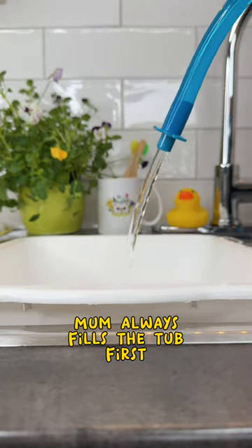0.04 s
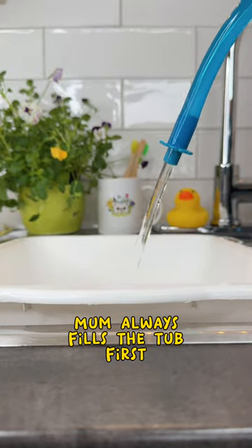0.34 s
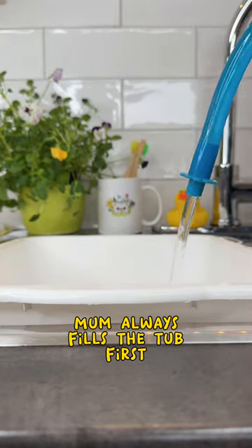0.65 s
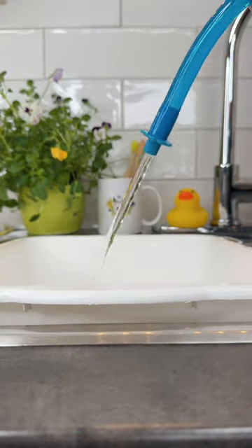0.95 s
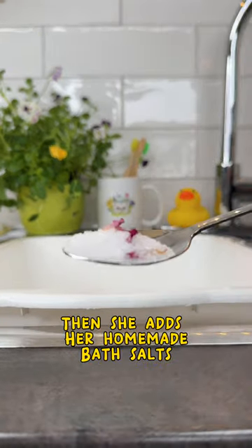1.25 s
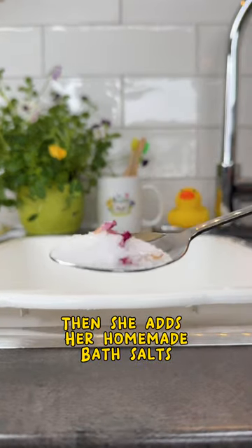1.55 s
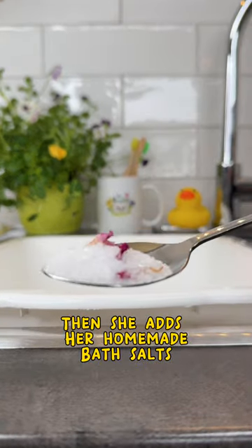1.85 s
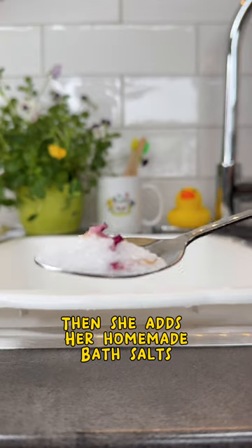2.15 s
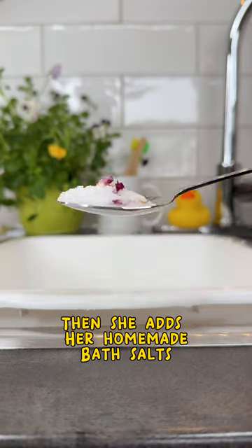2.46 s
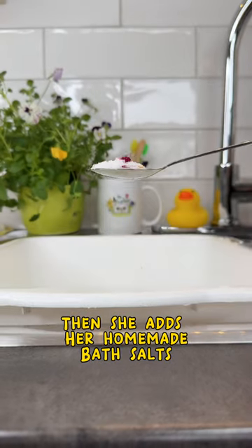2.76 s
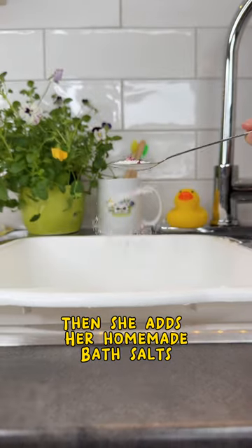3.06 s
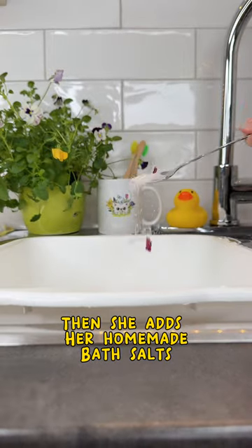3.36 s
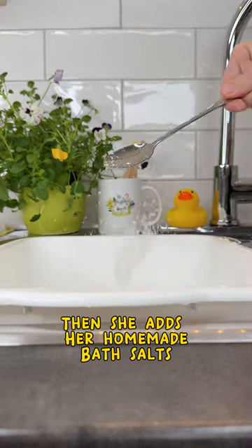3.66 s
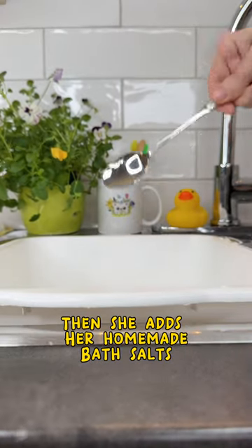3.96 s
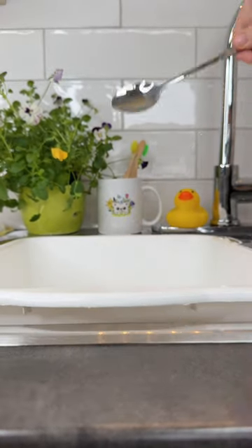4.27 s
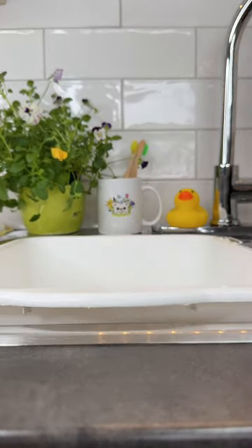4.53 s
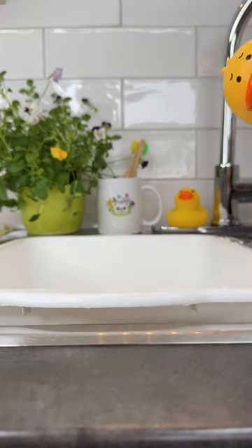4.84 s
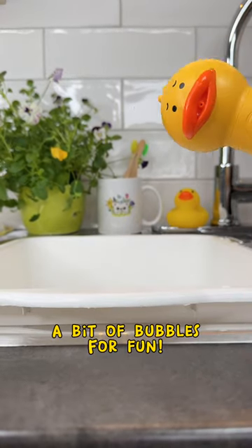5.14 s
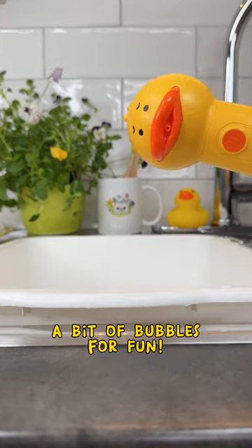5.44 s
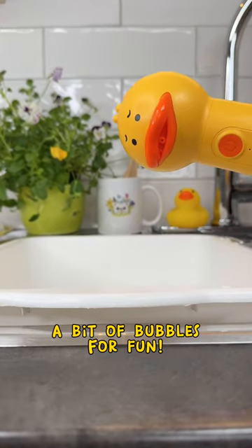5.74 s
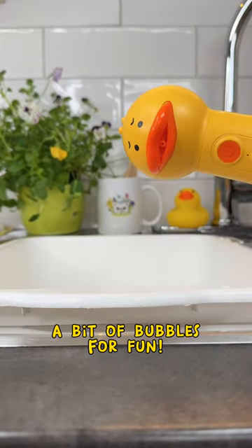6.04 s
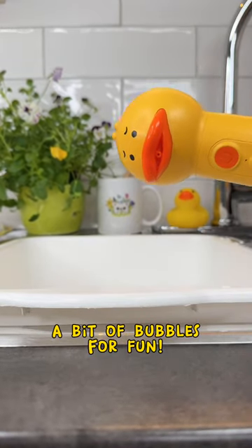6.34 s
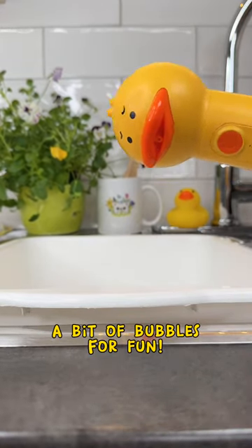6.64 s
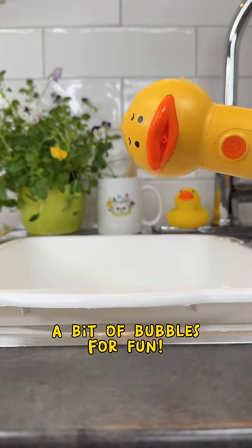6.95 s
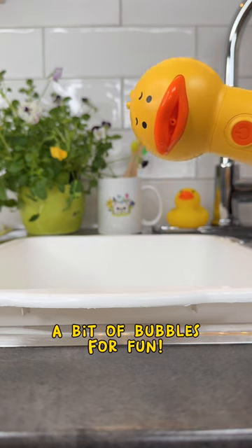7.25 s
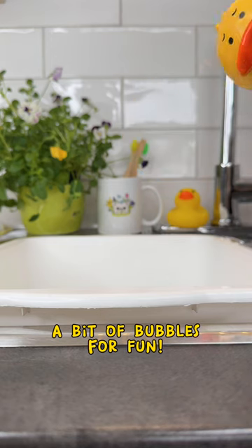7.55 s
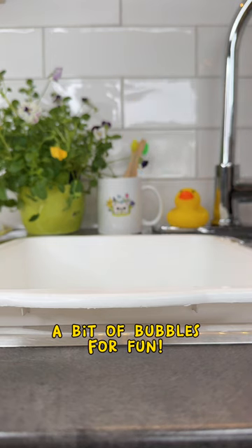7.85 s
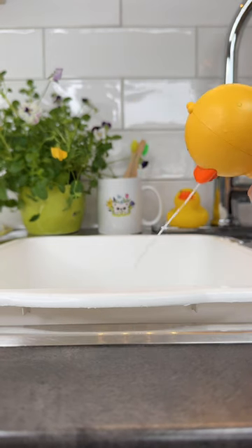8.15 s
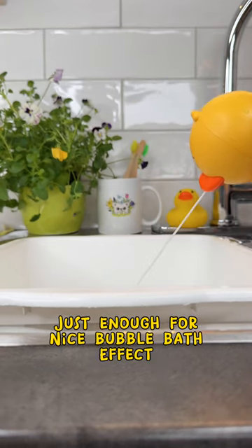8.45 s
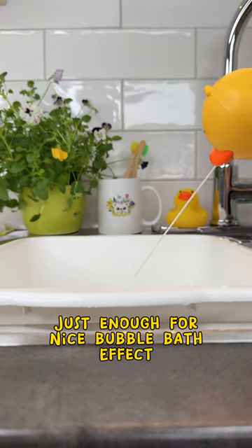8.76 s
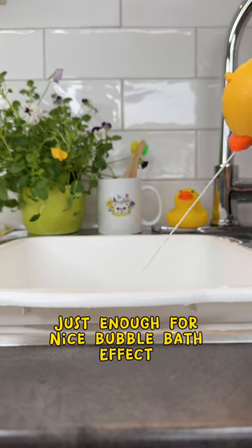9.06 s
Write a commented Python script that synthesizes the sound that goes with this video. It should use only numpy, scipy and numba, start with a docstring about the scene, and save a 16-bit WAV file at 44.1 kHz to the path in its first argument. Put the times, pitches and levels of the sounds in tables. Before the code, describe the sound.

Water gushes loudly from a hose into a small tub, bubbling, gurgling and spattering, then cuts off abruptly. After a pause, bath salts trickle onto the water with fine ticks, a few clumps splash in, and the grains fizz away softly. Following another quiet stretch, a battery toy sprayer spits air and buzzes as it squirts a thin jet into the water. It is all heard close by, indoors, over a low room rumble.

```python
"""Water gushes from a hose into a small tub on a counter, bubbling and spattering, until the sound breaks off
abruptly. Bath salts trickle off a spoon and tick on the water; clumps splash in and the sunken grains fizz out.
Last, a battery sprayer spits air, and its pump buzzes a thin jet into the water. A low room rumble lies under
it all, heard through two closely spaced microphone ports."""
import sys
import numpy as np
from scipy import signal
from scipy.fft import rfft, irfft, next_fast_len
from scipy.io import wavfile
from numba import njit

SR = 44100
rng = np.random.default_rng(int(sys.argv[2]) if len(sys.argv) > 2 else 0)


def wav_out(sig):
    """Save sig, one row per channel (or a flat mono array), as 16-bit PCM at SR to the path in sys.argv[1]."""
    wavfile.write(sys.argv[1], SR, np.round(np.clip(np.atleast_2d(sig).T, -1, 1) * 32767).astype(np.int16))


N = 401310
T = np.arange(N) / SR
HOSE_OFF_S, JET_ON_S = 1.219, 8.111
HOSE_TRIM = np.sqrt(HOSE_OFF_S / T[-1])  # turns rms 1 over the scene into rms 1 while the hose runs

# stereo width, as gain on the side signal: f/Hz, level/dB
SIDE_EQ = [(60, -26.5), (200, -14.5), (380, -6.5), (700, 1), (1290, -4.5), (1850, -19), (2500, -2.5),
           (3100, 1.5), (4400, 0), (8000, -3), (11500, -35.5), (15000, -15)]
# how far the left port leads the right: f/Hz, phase/rad
PORT_LEAD = [(20, 0), (4400, 0), (6000, -.7), (8000, -1.55), (10100, -2.15), (11000, -3), (13200, -3.3),
             (14200, -3.9), (15500, -4.6)]
# bass-heavy room tone: f/Hz, level/dB
ROOM_EQ = [(20, -12.5), (40, -9), (62, 2), (110, 0), (165, -8.5), (225, -5.5), (400, -13), (540, -12.5),
           (800, -17), (1150, -25.5), (1550, -28.5), (2000, -33), (2380, -33), (2950, -44), (3700, -46.5),
           (5000, -50.5), (6000, -47), (11500, -52.5), (15000, -52)]
# dull, soft hiss: f/Hz, level/dB
HISS_EQ = [(800, 0.5), (2200, 1.5), (4500, -8), (6500, -15), (12000, -32)]
# hiss cues (a negative fall swells): start/s, end/s, level/dB, fall/(dB/s)
HISS_CUES = [(1.217, 1.646, -72, 12.5), (3.81, 4.42, -66.5, 18.5), (7.5, 8.105, -83.5, -4)]
# single bubbles that plop, plink or snap: t/s, level/dB, f/Hz, t60/s
SOLO_BUBBLES = [(.001, -23.5, 6380, 0.02), (0.025, -29, 6100, 0.027), (.07, -30, 375, 0.072),
                (.074, -33.5, 830, 0.026), (0.083, -32.5, 1750, 0.025), (.152, -33, 365, .06),
                (.193, -34.5, 380, .06), (.243, -40, 360, 0.1), (.344, -37.5, 2410, .04),
                (.36, -35, 486, 0.043), (.505, -24.5, 2400, 0.019), (.571, -31, 2390, .025),
                (.605, -33, 392, 0.065), (.652, -35, 272, 0.1), (.67, -38, 376, .1),
                (.682, -34.5, 2460, 0.026), (0.875, -38, 394, 0.17), (.986, -29, 2610, 0.034),
                (.988, -33, 1217, 0.044), (1.048, -37, 1850, 0.04), (1.05, -33.5, 380, .08),
                (1.068, -37.5, 667, .05), (1.074, -32, 1295, .04), (3.131, -52, 3320, .03),
                (3.184, -52, 3020, 0.02), (3.321, -47.5, 4070, 0.025), (3.391, -35.5, 1866, 0.034),
                (3.4125, -43.5, 5200, .012), (3.4254, -11.5, 7650, 0.0022), (3.4385, -20.5, 5820, 0.0065),
                (3.486, -51, 2650, 0.04), (3.563, -41, 7800, .02), (3.584, -40.5, 7550, .02),
                (3.6, -44, 6300, 0.021), (3.646, -58.5, 4000, 0.026), (8.194, -28.5, 1236, 0.0087),
                (8.197, -22, 746, 0.012), (8.347, -27, 2120, 0.0088), (8.643, -31, 1670, 0.01),
                (9.0225, -31.5, 2780, 0.014), (9.0312, -23, 664, 0.031), (9.045, -30.5, 695, 0.038)]
# short bright ticks: grains or droplets landing, and one faint click at 4.73 s: t/s, level/dB
TICK_HITS = [(3.128, -42), (3.3105, -38), (3.415, -37), (3.428, -32), (3.5635, -43), (3.583, -43),
             (3.598, -53), (3.653, -59), (4.004, -58), (4.026, -58), (4.062, -59), (4.079, -60),
             (4.12, -64), (4.142, -60), (4.161, -63), (4.22, -64), (4.335, -70), (4.452, -75),
             (4.5707, -73), (4.731, -69), (8.389, -41.5), (8.4, -40), (8.683, -42), (8.7645, -36),
             (8.846, -44), (9.04, -34.5)]
# their bright tone: f/Hz, level/dB
TICK_EQ = [(500, -43.5), (2000, -17.5), (3500, -21.5), (5500, -5), (8000, 3), (11000, 2.5), (15000, 4)]

# salt slides off the spoon in small lots: t/s, level/dB
SALT_SLIDES = [(2.795, -67), (2.85, -66), (2.94, -58), (3.01, -62.5), (3.09, -57), (3.13, -46.5),
               (3.305, -53.5), (3.41, -44), (3.48, -52.5), (3.555, -53.5), (3.99, -66), (4.11, -79),
               (4.56, -73), (4.64, -73)]
# sizzle of fine grains on water: f/Hz, level/dB
SALT_EQ = [(500, -40), (2000, -13.5), (3500, -16), (5000, -16.5), (7500, -4), (11000, -8.5), (14000, 1.5),
           (14900, 11.5), (15600, -4)]
# clumps of salt splashing in: t/s, level/dB, hold/s, t60/s
CLUMP_HITS = [(3.373, -46.5, 0.0034, 0.066), (3.39, -53, .003, .04), (3.696, -43, 0.0043, 0.053),
              (3.707, -32.5, 0.018, 0.19), (3.798, -34, 0.0018, 0.039), (3.829, -44.5, 0.0033, 0.045)]
# their splash: f/Hz, level/dB
SPLASH_EQ = [(200, -22), (350, -7), (600, -13.5), (1000, -9), (1400, -4), (1650, -9.5), (2000, -6),
             (4000, -10.5), (7000, 2), (11000, 0.5), (15000, 1.5)]
# the tub rings under each clump: f/Hz, width/Hz, level/dB
KNOCK_MODES = [(360, 62, -17), (1020, 40, -10.5), (1325, 34, 6), (2026, 160, -6.5), (2780, 180, -6)]
# sinking salt drags down swarms of small bubbles: t/s, level/dB
SWARM_CUES = [(3.168, -48), (3.305, -55), (3.435, -56.5), (3.505, -58.5), (3.63, -61)]
# their sparkle: f/Hz, level/dB
SWARM_EQ = [(2000, -17.5), (3300, -10.5), (4500, -0.5), (6000, 4), (7800, 1), (10000, -8.5)]

# turning rate of the sprayer motor: t/s, f/Hz
MOTOR_SPEED = [(8.1, 73.6), (8.3, 73.95), (8.45, 74.15), (8.68, 74.65), (8.9, 74.4), (9.1, 74.6)]
# overtones of its buzz: multiple of the turning rate, level/dB
MOTOR_HARMONICS = [(3, 1), (8, -6), (9, -4), (10, -5), (12, -9), (14, -8), (16, -9), (18, -1), (19, -4),
                   (20, -6), (21, -3), (22, -4), (23, 0), (24, -3), (25, -6), (27, 0), (28, -4), (29, 0),
                   (30, -1), (31, -3), (32, 1), (33, -7), (35, -6), (36, -5), (39, -7), (40, -7), (41, -8),
                   (76, -7), (79, -10), (81, -11), (82, -9), (83, -2.5)]
# one overtone swells into a whine as the sprayer is moved: t/s, level/dB against the buzz
WHINE_SWELL = [(8.1, -12), (8.65, -13), (8.93, -5.5), (9.1, -5)]
# rattle of the pump gears: f/Hz, level/dB
GEAR_EQ = [(200, -35), (650, -16), (1100, -16), (1700, -20), (2200, -11), (2700, -10), (3900, -22),
           (5200, -11), (6100, 0.5), (7000, -18), (9300, 0.5), (10000, -11), (12000, -22), (15500, -9)]
# the thin jet hitting water: f/Hz, level/dB
JET_EQ = [(60, 1), (230, -1.5), (400, -5), (640, -3.5), (1100, -4.5), (1500, 1), (2000, 0.5), (3000, -5.5),
          (3900, -10), (5100, -9.5), (6200, -6), (7200, -7), (9600, -15), (15500, -7.5)]
# its drumming on the water: f/Hz, width/Hz, level/dB
JET_DRUM_MODES = [(598, 64, 1), (684, 56, -3.5)]
# slugs of air pop out of the nozzle: t/s, level/dB
AIR_POPS = [(8.111, -45), (8.129, -33), (8.1425, -27), (8.157, -28), (8.1705, -42), (8.1735, -24.5),
            (8.179, -27), (8.201, -34)]
# sharp spit of the nozzle: f/Hz, level/dB
SPIT_EQ = [(300, -8), (700, -22), (2000, -3), (3800, -5), (6000, -3), (8500, 4), (11000, 8), (15000, 0.5)]

# splashing rises and falls as the hose sways: t/s, level/dB
HOSE_SWAY = [(0, 2.5), (.11, -4), (.19, 1.5), (.27, -2), (.47, -1), (.55, -0.5), (.63, 0), (.73, -2),
             (.8, -6), (.92, -3.5), (.99, -0.5), (1.2, 0)]
# bubbling of the stream: f/Hz, level/dB
BUBBLING_EQ = [(250, -15), (450, 3.5), (570, -16.5), (700, 3.5), (1000, 1), (1550, -0.5), (2400, 3),
               (3200, 0.5), (4600, -11), (8000, -25)]
# sharp resonances of the air in the tub: f/Hz, width/Hz, level/dB
TUB_AIR_MODES = [(678.5, 45, 1.5), (936, 48, 1.5), (1254, 89, 2), (1825, 100, 2), (2330, 40, 0.5),
                 (2570, 90, -0.5), (2880, 45, -4), (3210, 99, -5)]
# the stream wobbles and gulps a cluster of bubbles: t/s, level/dB, f/Hz, hold/s
GULP_CUES = [(0.011, -47.5, 2395, 0.003), (.067, -41, 900, 0.01), (0.086, -40.5, 1697, 0.007),
             (.159, -41, 1940, .023), (0.187, -41, 1600, .006), (.366, -41, 2390, 0.0055),
             (0.409, -49, 990, 0.053), (0.505, -38.5, 2460, .005), (0.57, -39.5, 2100, 0.0081),
             (0.602, -46, 1100, 0.027), (0.607, -51.5, 3220, .04), (0.679, -45.5, 2290, 0.0087),
             (0.977, -46.5, 2390, .0065), (1.07, -43.5, 1500, .007), (1.115, -47.5, 2600, 0.028)]
# bright spatter, with a deep EQ notch cut at 11.5 kHz: f/Hz, level/dB
SPATTER_EQ = [(1000, -11.5), (3000, -5.5), (4600, -4.5), (6500, -0.5), (8000, -1), (10000, -2.5),
              (11500, -47), (15500, 1)]
# the stream slaps the surface and throws spatter: t/s, level/dB, hold/s
SLAP_HITS = [(0, -47, 0.0091), (0.138, -43, 0.026), (0.328, -52, 0.0077), (.442, -45, .002),
             (0.835, -53, 0.033), (0.954, -44, 0.03), (1.067, -36.5, .005)]
# large pockets of air ring in the tub: f/Hz, width/Hz, level/dB
POCKET_MODES = [(225.3, 20, -9.5), (264, 41, -1), (305.7, 26, -3.5), (381, 22, 7), (420, 5.8, 1),
                (492, 17, -6)]
# the tub floor drums under the stream: f/Hz, width/Hz, level/dB
FLOOR_MODES = [(69, 12, 1.5), (105.2, 13, 2)]


def undb(db):
    """Decibels to gain."""
    return 10 ** (np.asarray(db) / 20)


def unit(x):
    """Scale to rms 1."""
    return x / np.sqrt(np.mean(x ** 2))


def automation(points):
    """Straight ramps between (time, value) points."""
    return np.interp(T, *np.array(points).T)


def gate(start, end):
    """Open between two times, with 4 ms fades."""
    return np.clip((T - start) / .004, 0, 1) * np.clip((end - T) / .004, 0, 1)


def envelope(start, db, hold, t60, attack=1 / SR):
    """A straight attack, a hold and an exponential decay; times in seconds."""
    age = T - start
    out = np.zeros(N)
    live = (age > 0) & (age < attack + hold + 2 * t60)
    age = age[live]
    decay = np.exp(-np.log(1000) * np.maximum(age - attack - hold, 0) / t60)
    out[live] = undb(db) * np.minimum(age / attack, 1) * decay
    return out


def bursts(cues, **shape):
    """Trigger one envelope shape at each (time, level) cue."""
    return sum(envelope(start, db, **shape) for start, db in cues)


def filtered(x, response):
    """Apply a complex response given as a function of frequency."""
    size = next_fast_len(N + 16384, True)
    hz = np.maximum(np.arange(size // 2 + 1) * SR / size, 1)
    return irfft(rfft(x, size) * response(hz), size)[:N]


def along(hz, points):
    """Read (frequency, value) points on a log-frequency axis."""
    points = np.array(points)
    return np.interp(np.log(hz), np.log(points[:, 0]), points[:, 1])


def eq(x, points):
    """Shape a sound with an EQ curve, then scale to rms 1."""
    return unit(filtered(x, lambda hz: undb(along(hz, points))))


def ring(x, modes):
    """Parallel resonators, each given as (frequency, width, level)."""
    def response(hz):
        return sum(undb(db) / (1 + 1j * (hz * hz - f * f) / (hz * width)) for f, width, db in modes)
    return filtered(x, response)


def noise():
    """White noise."""
    return rng.standard_normal(N)


def wander(rate):
    """Random drift with a spread near 1, taking `rate` new values a second."""
    knots = rng.standard_normal(4000)
    return 1.2 * np.interp(T * rate, np.arange(len(knots)), knots)


def impacts(rate, spread):
    """Random clicks, `rate` a second; `spread`, held to 1..6 dB, makes some stand out."""
    when = np.flatnonzero(rng.random(N) < rate / SR)
    sign, size = rng.standard_normal((len(when), 2)).T
    out = np.zeros(N)
    out[when] = np.sign(sign) * undb(np.clip(spread, 1, 6) * np.clip(size, -3, 2.3))
    return unit(out)


@njit
def bubble_train(start, size, hz, t60, rise):
    """Each bubble is a sine that swells within a cycle or two, then dies while its pitch climbs."""
    out = np.zeros(N)
    for k in range(len(start)):
        first, length = int(start[k] * SR), int(t60[k] * SR) + 2
        phase, gain = 0., size[k]
        fade = np.exp(-np.log(1000) / length)
        for i in range(max(first, 0), min(first + length, N)):
            phase += 2 * np.pi * hz[k] * (1 + rise * (i - first) / length) / SR
            out[i] += gain * np.sin(phase) * min(phase / (3 * np.pi), 1.)
            gain *= fade
    return out


def bubble_cloud(start, end, low_hz, high_hz, cycles, spread_db, rise, count):
    """Many bubbles of random size; the small ones are high and brief."""
    when, pitch, size, life = rng.random((count, 4)).T
    hz = low_hz + (high_hz - low_hz) * pitch ** 2
    gain = undb(spread_db * np.minimum(-np.log(1 - size), 3)) * (hz / high_hz) ** .75
    t60 = cycles * (.5 + life) / hz
    return unit(bubble_train(start + (end - start) * when, gain, hz, t60, rise))


def reflections(x):
    """Quick echoes from the tub, which shift as the water rocks, then the faint tail of the room."""
    age = T[:SR // 3]
    rocking = 1.4 * wander(9)
    out = 0
    for weight, db, t60 in ((np.cos(rocking), -7, .15), (np.sin(rocking), -7, .15), (1, -15, .3)):
        tail = rng.standard_normal(len(age)) * np.exp(-np.log(1000) * age / t60) * (age > .001)
        out = out + weight * undb(db) * signal.oaconvolve(x, tail / np.sqrt(np.sum(tail ** 2)))[:N]
    # long waves pass round the small walls
    return signal.sosfilt(signal.butter(2, 300, "high", fs=SR, output="sos"), out)


def in_room(x, wet=1):
    """Mid and side of a source in or near the tub."""
    mid, side = (wet * reflections(x) for _ in range(2))
    return np.array([x + mid, side])


def ports(mid, side):
    """Left and right at two closely spaced ports, further out of phase the higher the treble."""
    side = filtered(side, lambda hz: undb(along(hz, SIDE_EQ)))
    left = filtered(mid + side, lambda hz: np.exp(.5j * along(hz, PORT_LEAD)))
    right = filtered(mid - side, lambda hz: np.exp(-.5j * along(hz, PORT_LEAD)))
    return np.array([left, right])


def room_tone():
    """A bed of low rumble with a soft hum and a thin, wavering whine, as mid and side."""
    mid, side = (eq(noise() * undb(.81 * wander(3.9)), ROOM_EQ) for _ in range(2))
    hum = unit(ring(noise(), [(59.6, 6.5, 0)]))
    whine = unit(ring(noise(), [(1370, 40, 0)])) * undb(2.5 * wander(1.5))
    return np.array([undb(-57.5) * mid + undb(-64) * hum + undb(-85.5) * whine, undb(-56.5) * side])


def faint_hiss():
    """A soft hiss that comes and goes around the louder sounds."""
    fader = sum(undb(db - fall * np.clip(T - start, 0, end - start)) * gate(start, end)
                for start, end, db, fall in HISS_CUES)
    return eq(noise(), HISS_EQ) * fader


def rustle():
    """A brief, fine-grained rustle."""
    grains = unit(ring(impacts(4000, spread=3), [(5200, 1800, 0)]))
    return grains * undb(-80) * gate(4.652, 4.738)


def plops():
    """The large bubbles that stand out, and the tiny ones that snap."""
    start, db, hz, t60 = np.array(SOLO_BUBBLES).T.copy()
    return bubble_train(start, undb(db), hz, t60, rise=.1)


def ticks():
    """Short bright ticks: grains or droplets landing, and one faint click at 4.73 s."""
    crackle = eq(impacts(9000, spread=3.5), TICK_EQ)
    return crackle * bursts(TICK_HITS, attack=.0015, hold=.0023, t60=.027)


def salt_trickle():
    """Fine grains tick on the water and trap tiny bubbles; the sunken salt fizzes out."""
    pings = bubble_cloud(2.8, 4.7, 5000, 15500, cycles=110, spread_db=3, rise=.03, count=1800)
    pings *= np.sqrt(1.9 / T[-1])  # rms 1 over their own span
    grains = eq(impacts(5000, spread=2.5) + undb(-7) * pings, SALT_EQ)
    sliding = bursts(SALT_SLIDES, attack=.03, hold=.013, t60=.3)
    sprinkling = envelope(2.95, db=-55.5, attack=.45, hold=.27, t60=.2)  # while the spoon is tipped
    fizzing = envelope(3.72, db=-60, attack=.03, hold=0, t60=1.93)
    return grains * (np.hypot(sliding, sprinkling) + fizzing) * gate(0, 4.74)


def salt_clumps():
    """Clumps break the surface with a splash and set the tub ringing."""
    plunging = sum(envelope(*hit) for hit in CLUMP_HITS)
    splash = eq(impacts(9000, spread=1), SPLASH_EQ)
    knocks = impacts(9000, spread=2)
    ringing = ring(knocks * plunging, KNOCK_MODES) / np.std(ring(knocks, KNOCK_MODES))
    return splash * plunging + undb(-11) * ringing


def salt_swarms():
    """Sinking salt drags down swarms of small bubbles."""
    cloud = bubble_cloud(3.1, 3.7, 2400, 9500, cycles=50, spread_db=2.2, rise=.05, count=2400)
    sparkle = eq(cloud, SWARM_EQ) * np.sqrt(.6 / T[-1])
    return sparkle * bursts(SWARM_CUES, attack=.012, hold=.011, t60=.12)


def pump_motor(turns, stroke):
    """The motor buzzes and whines; the gears rattle much the same on every turn."""
    shaky = turns + .0016 * wander(120)  # play in the gears blurs the high overtones
    buzz = unit(sum(undb(db) * np.sin(2 * np.pi * (k * shaky + rng.random()))
                    for k, db in MOTOR_HARMONICS))
    whine = np.sqrt(2) * np.sin(2 * np.pi * 26 * turns) * undb(automation(WHINE_SWELL))
    teeth = rng.standard_normal(600)
    rattle = np.interp(shaky % 1, np.linspace(0, 1, len(teeth)), teeth)
    return undb(-5) * (buzz + whine) + undb(-10) * eq(rattle * stroke, GEAR_EQ)


def thin_jet(stroke):
    """The pulsing jet drills bubbles into the water and drums on it."""
    cloud = bubble_cloud(JET_ON_S, T[-1], 463, 4130, cycles=25, spread_db=5, rise=.087, count=900)
    cloud *= np.sqrt(1 - JET_ON_S / T[-1])
    splashing = eq(impacts(7000, spread=1) * stroke + undb(-7.5) * cloud, JET_EQ)
    drumming = unit(ring(impacts(2500, spread=6), JET_DRUM_MODES))
    return undb(-3.5) * splashing + undb(-10.5) * drumming


def nozzle_spit():
    """Air spits out unevenly as the pump primes, then the last of it clears from the tube."""
    priming = envelope(JET_ON_S, db=-40, attack=.036, hold=.036, t60=.11)
    clearing = envelope(JET_ON_S, db=-41, attack=.036, hold=.036, t60=1)
    pops = bursts(AIR_POPS, hold=.0012, t60=.012)
    crackle = eq(impacts(12000, spread=6), SPIT_EQ)
    return crackle * ((priming + clearing) * undb(.8 * wander(130)) + pops)


def sprayer():
    """A battery pump strokes twice a turn and weakens a little as it runs; mid and side."""
    turns = np.cumsum(automation(MOTOR_SPEED) * (1 + .00049 * wander(30))) / SR
    stroke = .96 + np.exp(-(2 * turns % 1) / .44)
    running = undb(-44 - .2 * np.maximum(T - JET_ON_S, 0)) * gate(JET_ON_S, 10)
    motor = pump_motor(turns, stroke) * running
    water = thin_jet(stroke) * running + nozzle_spit()
    # the motor is held above the tub, clear of most echoes
    return in_room(water) + in_room(motor, wet=.5)


def hose_bubbling():
    """The stream drags air under, and the hollow of the tub rings with it."""
    cloud = bubble_cloud(0, HOSE_OFF_S, 350, 5000, cycles=31, spread_db=2, rise=.099, count=3000)
    patter = impacts(6000, spread=6) * undb(3.5 * wander(60)) * gate(-1, HOSE_OFF_S)
    water = (cloud * HOSE_TRIM + undb(-1) * patter) * undb(.5 * wander(45))
    # the heaving surface bends the resonances of the tub
    hollow = np.interp(T + .0007 * wander(9), T, ring(water, TUB_AIR_MODES))
    return eq(water + undb(2.5) * hollow, BUBBLING_EQ) * HOSE_TRIM


def hose_spatter():
    """The top layer, notched by EQ: droplets tick on the surface among tiny fizzing bubbles."""
    fizz = bubble_cloud(0, HOSE_OFF_S, 3500, 12010, cycles=58, spread_db=3, rise=.12, count=1800)
    droplets = impacts(6000, spread=3) + undb(-4.5) * fizz * HOSE_TRIM
    return eq(droplets * gate(-1, HOSE_OFF_S), SPATTER_EQ) * HOSE_TRIM


def tub_body(sway_db):
    """The low end: large air pockets gurgle, and the tub floor drums louder as the water deepens."""
    pockets = bubble_cloud(0, HOSE_OFF_S, 200, 560, cycles=8, spread_db=0, rise=.1, count=900)
    gurgle = unit(unit(ring(pockets, POCKET_MODES)) + undb(-10.5) * pockets) * HOSE_TRIM
    drumming = unit(ring(noise(), FLOOR_MODES))
    return gurgle * undb(-45 + .61 * sway_db) + drumming * undb(-51 + 7 * np.minimum(T, HOSE_OFF_S))


def hose():
    """The swaying stream bubbles, gulps and slaps into the tub, then cuts off; mid and side."""
    sway_db = automation(HOSE_SWAY)
    bubbling, spatter, body = hose_bubbling(), hose_spatter(), tub_body(sway_db)
    gulps = sum(unit(ring(bubbling, [(hz, .5 * hz, 0)])) * envelope(start, db, hold, t60=.034)
                for start, db, hz, hold in GULP_CUES)
    slapping = sum(envelope(*hit, attack=.01, t60=.1) for hit in SLAP_HITS)
    spattering = undb(-42.5 + sway_db + 2.2 * wander(70)) + slapping
    surface = bubbling * undb(-43 + sway_db) + gulps * HOSE_TRIM + spatter * spattering
    return (in_room(surface) + in_room(body, wet=.28)) * gate(-1, HOSE_OFF_S + .004)


def scene():
    """Hose, salts and sprayer in turn, over the room tone."""
    stream = hose()
    salts = salt_trickle() + salt_clumps() + salt_swarms()
    details = ticks() + plops() + rustle() + faint_hiss()
    tub = ports(*(stream + in_room(salts + details) + sprayer()))
    room = ports(*room_tone())
    left, right = tub + room
    # the low mids are fuller on the right, most broadly those of the room
    low_mids = ring(tub[1], [(510, 180, -9)]) + ring(room[1], [(420, 1200, -9.5)])
    return np.array([left, right + low_mids])


def record(dry):
    """Master EQ: shed the deepest rumble and cut the very top steeply."""
    dry = signal.sosfilt(signal.butter(2, 30, "high", fs=SR, output="sos"), dry)
    return signal.sosfilt(signal.ellip(10, .2, 70, 15900, fs=SR, output="sos"), dry)


dry = scene()
out = record(dry)
wav_out(out)
```